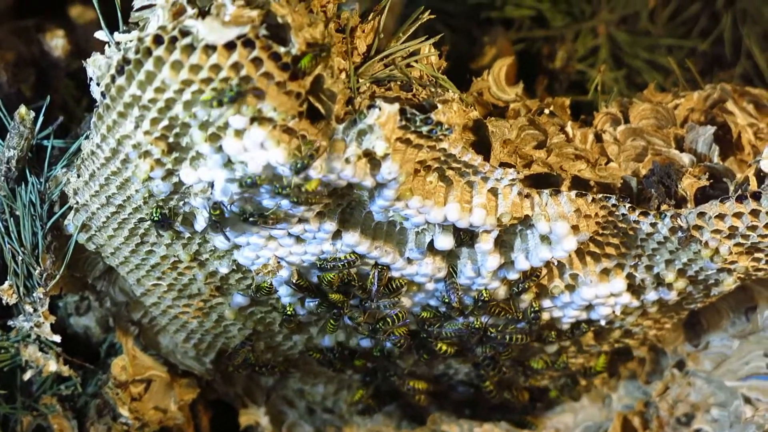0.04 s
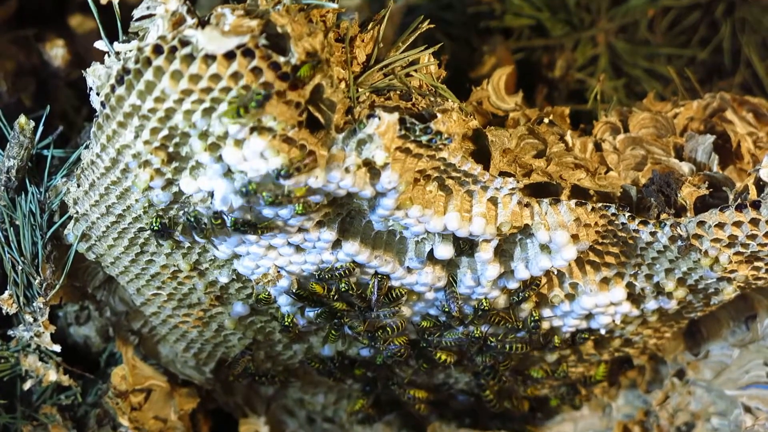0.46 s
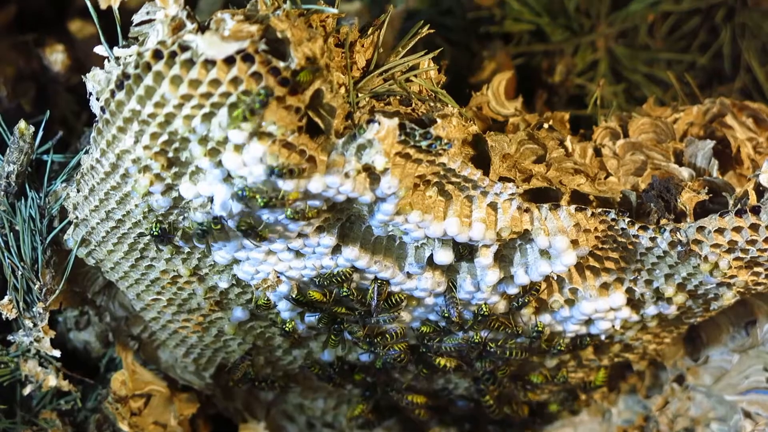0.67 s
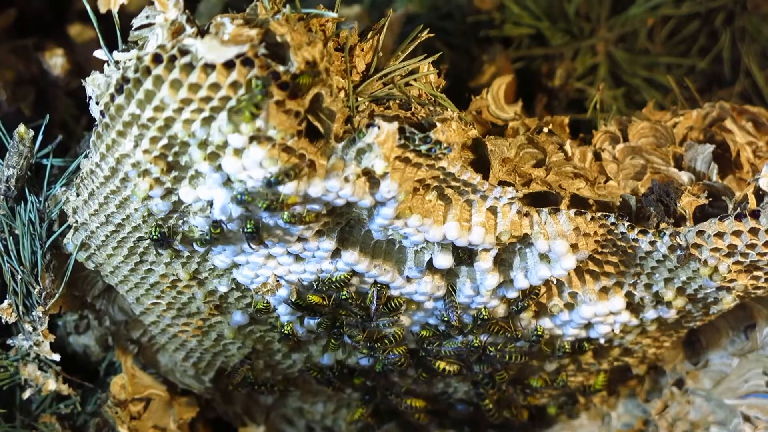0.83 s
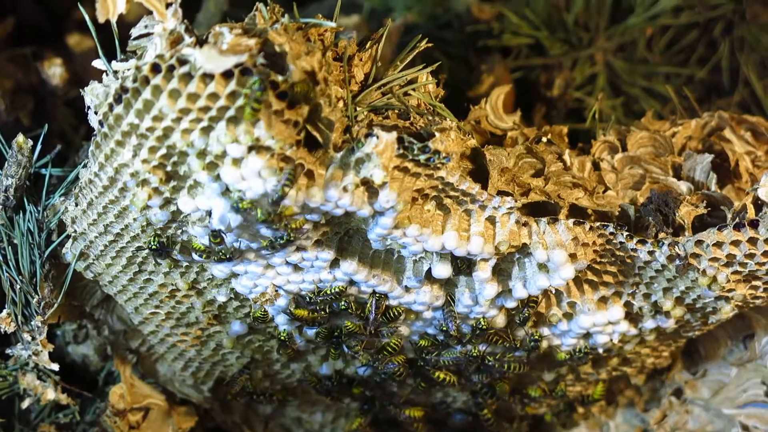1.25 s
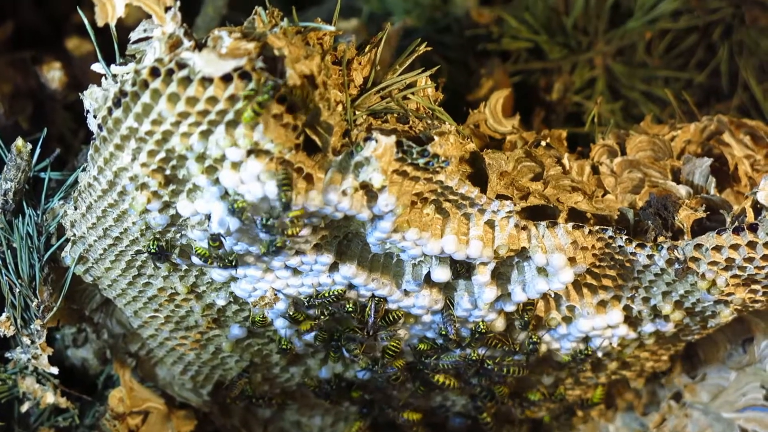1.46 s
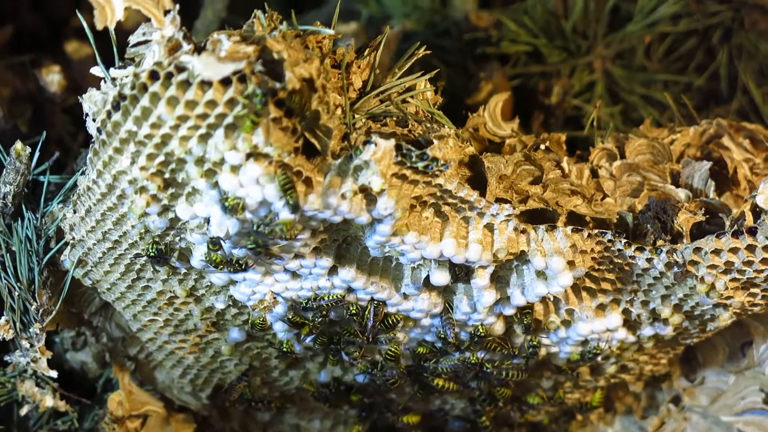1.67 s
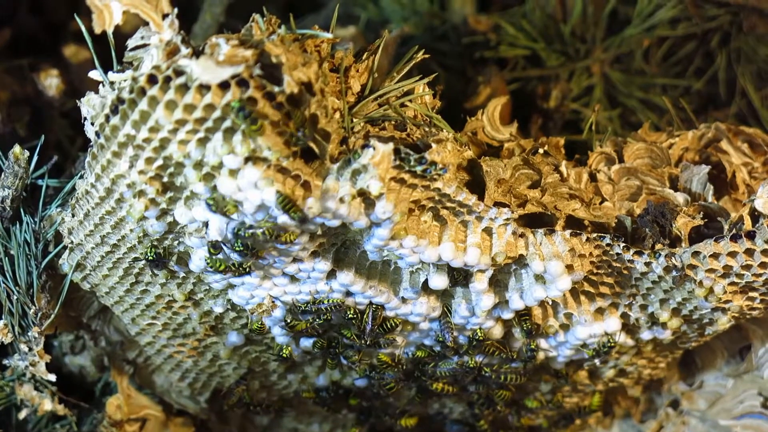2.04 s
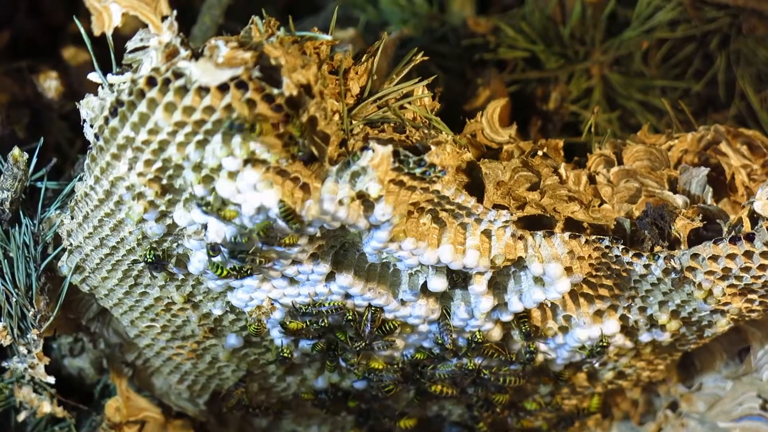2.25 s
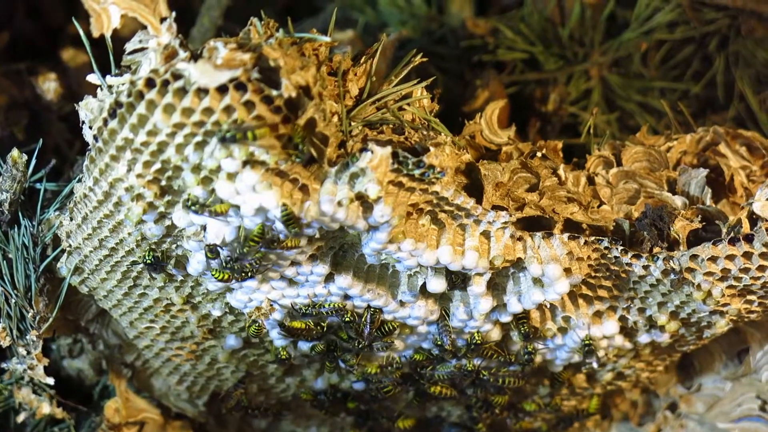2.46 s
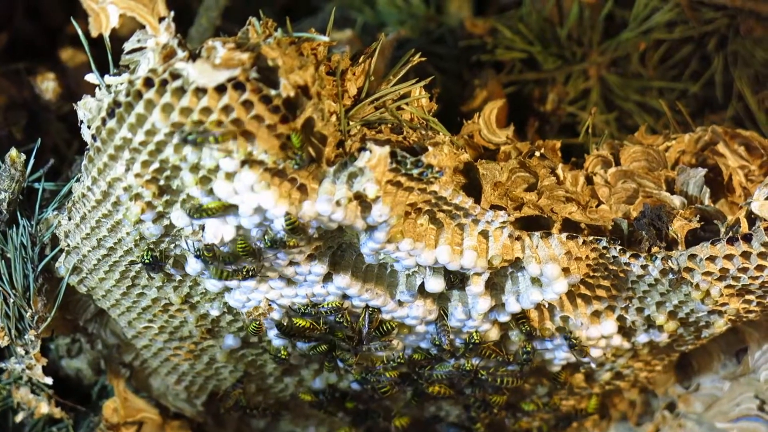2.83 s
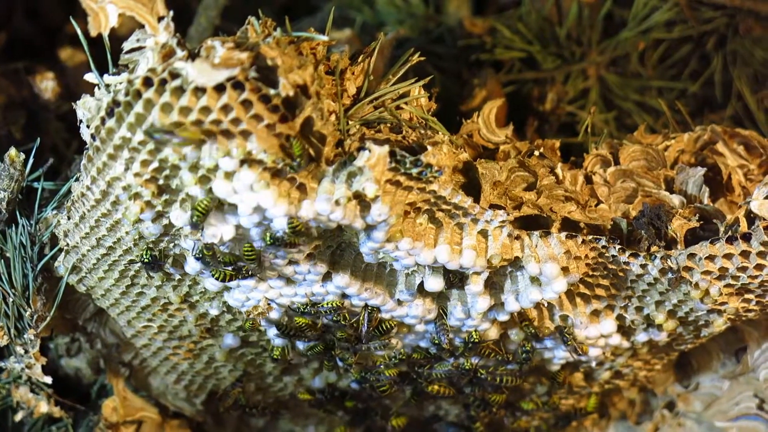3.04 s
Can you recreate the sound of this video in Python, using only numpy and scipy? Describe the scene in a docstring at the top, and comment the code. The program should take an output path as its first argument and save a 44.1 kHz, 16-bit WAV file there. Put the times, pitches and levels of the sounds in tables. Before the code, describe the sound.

Buzzing wasps fly near and away, with one sharp click and a faint colony hum.

```python
"""An open wasp nest among twigs, the microphone close in, the colony humming farther off over a soft hiss.
At once a wasp almost brushes the microphone, its wingbeats flaring into a rasp; a sharp click, like a
skip in the recorder, interrupts the close buzz with a short low thump. Two more wasps then buzz more
faintly, one at a lower pitch, and from about two seconds on another pair flies close. All along, stirred
air rumbles on the microphone, and now and then wing tips tick against the dry paper comb."""
import sys
import numpy as np
from scipy import signal
from scipy.fft import rfft, irfft, next_fast_len
from scipy.io import wavfile

SR = 44100
rng = np.random.default_rng(int(sys.argv[2]) if len(sys.argv) > 2 else 0)


def store_pcm(level_fs):
    """Save levels as 16-bit WAV."""
    pcm = np.round(np.clip(level_fs, -1, 1) * 32767).astype(np.int16)
    wavfile.write(sys.argv[1], SR, np.atleast_2d(pcm).T)


N = 136710
TIME = np.arange(N) / SR
WINGBEAT_JITTER = .00689  # fast waver, as a fraction of the wingbeat rate


def from_db(db):
    """Decibels to gain."""
    return 10 ** (np.asarray(db) / 20)


def unit_rms(x):
    """Scale to unit rms."""
    return x / np.sqrt(np.mean(x ** 2) + 1e-20)


def bell(x, centre, width):
    """A Gaussian bump of height 1."""
    return np.exp(-.5 * ((x - centre) / width) ** 2)


def in_time(rows):
    """Read each column at every sample, along the times in the first column."""
    times, *columns = np.transpose(rows)
    return [np.interp(TIME, times, column) for column in columns]


def at_hz(tone, hz):
    """Read a spectrum in dB on a log-frequency axis."""
    frequencies, db = np.transpose(tone)
    return np.interp(np.log(hz + 1e-3), np.log(frequencies), db)


def drift(rate_hz):
    """Smooth random wander of spread 1, mostly slower than rate_hz."""
    hop, run_in = 100, 1000
    pole = np.exp(-2 * np.pi * rate_hz * hop / SR)
    draws = rng.standard_normal(N // hop + run_in + 2)
    slow = signal.lfilter([1], [1, -2 * pole, pole * pole], draws)[run_in:]
    return np.interp(np.arange(N) / hop, np.arange(len(slow)), unit_rms(slow))


def coloured(x, tone):
    """Give a signal the colour of a spectrum table."""
    size = next_fast_len(N + SR // 10)
    gain = from_db(at_hz(tone, np.arange(size // 2 + 1) * SR / size))
    return irfft(rfft(x, size) * gain, size)[:N]


def noise(tone):
    """Coloured noise of unit rms."""
    return unit_rms(coloured(rng.standard_normal(N), tone))


def hiss():
    """Soft noise behind everything, slowly rising and falling."""
    # Loudness of the hiss. Each row: time in seconds, relative level in dB.
    levels = [(0.0, -64.5), (0.76, -61.5), (1.49, -68), (1.8, -65.5), (2.42, -60.5), (2.74, -61),
              (3.1, -62.5)]
    # Its colour. Each row: frequency in Hz, relative level in dB.
    tone = [(30, 13.5), (200, 17), (500, 13), (1000, 5.5), (2000, 1.5), (3200, -2), (5000, -4), (7500, -5),
            (10000, -4), (12400, -5), (12900, -63), (16000, -48)]
    return from_db(in_time(levels)[0] + 6) * noise(tone)


def low_rumble():
    """Stirred air makes a low, lumpy draught on the microphone; a few short thumps stand out of it."""
    # Strength of the draught. Each row: time in seconds, relative level in dB.
    draught_levels = [(0, -58.5), (.18, -57.5), (.27, -43), (.35, -60), (.41, -43.5), (.48, -53),
                      (.85, -53), (1.13, -58.5), (1.22, -44.5), (1.33, -55), (1.42, -48.5), (1.47, -53),
                      (1.54, -50), (1.68, -58), (1.85, -60), (1.92, -49), (2.02, -48.5), (2.22, -45),
                      (2.42, -37.5), (2.62, -51), (2.82, -44.5), (2.93, -54), (3.1, -50)]
    # Short low thumps: the first comes with the click, the later ones are wings fanning the microphone.
    # Each row: centre in seconds, level in dB, half-width in seconds.
    thumps = [(0.326, -20.5, 0.011), (1.544, -38.5, 0.018), (2.32, -33, 0.0085), (2.409, -36.5, 0.034),
              (2.5, -43, 0.031)]
    # Colours of draught and thumps. Each row: frequency in Hz, relative level in dB.
    draught_tone = [(10, 8.5), (25, 5), (50, -6), (80, -9.5), (120, -15), (200, -22.5), (400, -30),
                    (1000, -41), (8000, -100)]
    thump_tone = [(20, -18), (70, -5), (105, 3.5), (150, 0), (230, -6.5), (400, -24), (1000, -28.5),
                  (8000, -115)]
    draught = from_db(in_time(draught_levels)[0] + 6.5) * noise(draught_tone)
    thump_envelope = sum(from_db(db) * bell(TIME, centre, width) for centre, db, width in thumps)
    return draught + thump_envelope * noise(thump_tone)


def colony(wasps=6, harmonics=24, centre_hz=160.95, spread=.045, wander=.015):
    """Distant wasps, each wandering about its own wingbeat rate, beat against each other."""
    # The hum as it reaches the microphone. Each row: time in seconds, level in dB.
    levels = [(0, -52.5), (.3, -52.5), (.7, -53.5), (1, -91), (1.4, -59), (1.65, -67.5), (1.85, -57),
              (2.1, -47), (2.35, -42), (2.52, -45), (2.68, -46.5), (2.9, -55), (3.1, -49.5)]
    # Colour of a distant buzz. Each row: frequency in Hz, relative level in dB.
    tone = [(150, 3.5), (320, -2.5), (480, -9), (650, -13), (1000, -14.5), (1600, -21), (2500, -33),
            (4000, -35.5)]
    hum = 0
    for offset in np.linspace(-1, 1, wasps):
        hz = centre_hz * (1 + spread * offset)
        wingbeat_hz = hz * (1 + wander * drift(1.5) + WINGBEAT_JITTER * drift(28.6))
        phase = 2 * np.pi * np.cumsum(wingbeat_hz) / SR
        buzz = sum(from_db(at_hz(tone, k * hz)) * np.cos(k * phase + rng.normal(0, 1))
                   for k in range(1, harmonics + 1))
        hum = hum + buzz * from_db(1.93 * drift(2.23))
    return from_db(in_time(levels)[0]) * unit_rms(hum)


def wing_ticks(ticks_per_s=180, scatter_db=4.5, decay_s=.0011):
    """Wing tips brush the paper comb: short runs of dry ticks, one per wingbeat, that swell and fade."""
    # Brushes on the comb. Each row: centre in seconds, relative level in dB, swell and fade in seconds.
    brushes = [(.08, -52, 0.0054, .01), (.5315, -46.5, 0.00071, .004), (.6372, -48.5, 0.0089, 0.017),
               (.7328, -36.5, 0.0086, 0.011), (.7845, -41, 0.0075, 0.012), (1.377, -49.5, 0.0022, 0.0045),
               (2.1858, -50, 0.0072, .012), (2.389, -40, 0.022, 0.0055), (2.479, -51, .002, .003),
               (2.516, -52.5, 0.0051, 0.041), (2.577, -51, .008, .012), (2.608, -47, 0.0077, 0.0048),
               (2.926, -50.5, .004, .008)]
    # Colour of a tick. Each row: frequency in Hz, gain in dB.
    tone = [(1500, -26), (4000, -2.5), (7000, -2.5), (10000, 6), (12300, 4.5), (13000, -35), (16000, -60)]
    offsets_s = np.arange(-8, 9) / ticks_per_s
    strikes = np.zeros(N)
    for centre, db, swell, fade in brushes:
        contour = np.exp(-np.abs(offsets_s) / np.where(offsets_s < 0, swell, fade))
        samples = np.clip(((centre + offsets_s) * SR).astype(int), 0, N - 1)
        strikes[samples] += from_db(db + rng.normal(0, scatter_db, len(offsets_s))) * contour
    envelope = signal.lfilter([1], [1, -np.exp(-1 / (decay_s * SR))], strikes + 1e-18)
    return coloured(envelope * rng.standard_normal(N), tone)


def click(at_s=.325, db=-23.5, decay_s=.0011):
    """One sharp click, like a skip in the recorder: the wave rises, drops at once and settles."""
    age = TIME - at_s
    return -from_db(db) * np.sign(age) * np.exp(-np.abs(age) / decay_s)


def wing_swish(stroke_phase, sharpness=2.7):
    """Air torn by the wings: one wisp of noise at each stroke."""
    # Colour of the torn air. Each row: frequency in Hz, relative level in dB.
    tone = [(400, -31), (900, -0.5), (1700, -15.5), (2600, -30.5), (4000, -36), (8000, -10), (12500, -27),
            (14000, -62)]
    return unit_rms(noise(tone) * np.exp(sharpness * (np.cos(stroke_phase) - 1)))


def wasp(flight, tone, wander_rad, shimmer_db, flare_db=0, shimmer_hz=5.3, fade_s=.027):
    """One sawtooth-like pressure drop per wingbeat; the harmonics shimmer as the insect turns."""
    hz, fundamental_db, octave_db, overtone_db = in_time(flight)
    phase = 2 * np.pi * np.cumsum(hz * (1 + WINGBEAT_JITTER * drift(33.3))) / SR
    hum = from_db(fundamental_db) * np.cos(phase) + from_db(octave_db) * np.cos(2 * phase)
    edge = phase + 1.196  # a stroke's sharp edge leads its pressure trough
    rasp = 0
    for k in range(3, 33):
        partial_hz = k * hz.mean()
        db = at_hz(tone, partial_hz) + shimmer_db * drift(shimmer_hz)
        db += flare_db * bell(partial_hz, centre=1980, width=540)
        rasp = rasp + from_db(db) * np.sin(k * edge + wander_rad * drift(shimmer_hz))
    overtones = from_db(overtone_db) * (unit_rms(rasp) + from_db(-23) * wing_swish(edge))
    inside_flight_s = np.minimum(TIME - flight[0][0], flight[-1][0] - TIME)
    fade = np.clip(inside_flight_s / fade_s + 1, 0, 1)
    return -from_db(-1.5) * fade * (np.sqrt(2) * hum + overtones)


def nearby_wasps():
    """Four wasps a little way off the microphone, two at a time, their pulses blurred by phase wander."""
    # Flights about the nest. Each row: time in seconds, wingbeat in Hz,
    # then relative levels in dB of the fundamental, the octave and the overtones.
    hovering = [(.62, 164.1, -51, -61, -71), (.72, 170.3, -49.5, -65, -64), (.8, 172, -51.5, -66, -70),
                (.9, 168.5, -54.5, -73, -77), (.98, 170.9, -57.5, -89, -61), (1.1, 167.9, -51, -66, -61.5),
                (1.18, 162.4, -50, -57, -56.5), (1.3, 164.1, -58.5, -61.5, -63),
                (1.42, 160.7, -86, -76, -82), (1.62, 161.7, -72, -68, -86), (1.72, 162.9, -61, -65, -57.5),
                (1.86, 156.1, -63, -71, -69)]
    low_flight = [(.62, 152.2, -53, -62, -62), (0.692, 149.7, -63, -43.5, -60),
                  (0.782, 140.1, -52, -58, -52.5), (.87, 137.1, -57, -56.5, -70),
                  (.97, 140.6, -58, -59.5, -83), (1.1, 125.9, -60, -65.5, -85), (1.311, 125, -94, -74, -71),
                  (1.431, 142.5, -71, -56, -75), (1.506, 136.4, -78, -49.5, -56),
                  (1.557, 140.5, -37, -43.5, -50.5), (1.6, 145.3, -48.5, -59.5, -60),
                  (1.66, 136.6, -62, -66, -80)]
    circling = [(1.86, 157.8, -71, -68, -64.5), (1.912, 159.5, -41, -49.5, -54.5),
                (1.978, 161.3, -43.5, -67, -48), (2.089, 157.8, -45.5, -78, -53),
                (2.155, 158.4, -30, -39, -48.5), (2.205, 158, -44, -51, -53.5),
                (2.247, 158.9, -35, -67, -44), (2.289, 164.7, -25, -35, -40),
                (2.346, 161.8, -61, -43.5, -58.5), (2.391, 160.5, -44, -54, -44),
                (2.449, 160.8, -48, -55, -77), (2.53, 164, -37, -49, -47.5),
                (2.581, 163.5, -42, -48, -45.5), (2.69, 162.7, -63, -75, -74),
                (2.736, 163.6, -43, -73, -52), (2.79, 165.3, -72, -76, -73), (2.87, 165, -48.5, -85, -54),
                (2.94, 165.7, -54, -77, -61), (3, 168.7, -46, -53, -53), (3.1, 165.4, -48, -59, -49.5)]
    crossing = [(1.95, 154, -65, -56.5, -66), (2.1, 154.7, -62, -70, -58), (2.221, 151.5, -55, -46, -50),
                (2.302, 149.5, -29, -51, -57), (2.34, 147.6, -55, -44.5, -54),
                (2.42, 150.9, -35.5, -43, -48.5), (2.52, 154.7, -39, -45, -54),
                (2.62, 156.7, -58, -72, -66), (2.78, 150.7, -54.5, -66, -64),
                (2.95, 153.5, -68, -83, -59.5), (3.1, 160.1, -48, -68, -72)]
    # Wingbeat overtones at this distance. Each row: frequency in Hz, relative level in dB.
    tone = [(470, 3.5), (630, -10.5), (800, -5), (950, -14.5), (1270, -18), (1450, -19.5), (1900, -26),
            (2500, -28.5), (4000, -35), (6000, -47)]
    flights = (hovering, low_flight, circling, crossing)
    return sum(wasp(flight, tone, wander_rad=.86, shimmer_db=5.5) for flight in flights)


def closest_wasp():
    """A wasp almost brushes the microphone; a band of its crisp buzz flares as its wings turn that way."""
    # The close pass. Each row: time in seconds, wingbeat in Hz,
    # then relative levels in dB of the fundamental, the octave and the overtones.
    flight = [(0, 157.7, -47, -45, -55.5), (.04, 155.7, -45.5, -52.5, -71.5), (.11, 153.4, -71, -66, -54),
              (.145, 154.3, -50, -55, -62), (.2, 155.7, -44, -52, -52.5), (.262, 152.7, -32.5, -36.5, -43),
              (.292, 151, -25, -46.5, -37), (.315, 154.2, -24.5, -31.5, -33.5),
              (.338, 161.1, -23.5, -34, -44.5), (.372, 156.8, -26, -34.5, -37),
              (.424, 160, -33.5, -44, -43.5), (.484, 157.4, -37.5, -50.5, -49.5),
              (.508, 158, -45, -70, -57), (.6, 157.2, -37.5, -55, -43), (.65, 159.1, -51, -51, -73),
              (.68, 156, -44, -71, -66)]
    # Wingbeat overtones close up. Each row: frequency in Hz, relative level in dB.
    tone = [(470, 4.5), (630, -4), (800, -5.5), (950, -8.5), (1330, -12.5), (1480, -19), (1650, -26.5),
            (1950, -30), (2300, -34.5), (4000, -35.5), (6000, -46)]
    flare_db = 20.5 * bell(TIME, centre=.35, width=.018)
    return wasp(flight, tone, wander_rad=.22, shimmer_db=2.2, flare_db=flare_db)


def scene():
    """Near wasps, colony, ticks, rumble and hiss meet at one microphone beside the nest."""
    return (closest_wasp() + nearby_wasps() + colony() + wing_ticks() + low_rumble() + hiss())[None]


def record(dry, overload=.13, cutoff_hz=16800):
    """The loudest swings are flattened, a click interrupts the close buzz, and the top is cut."""
    rounded = dry / (1 + (dry / overload) ** 8) ** (1 / 8)
    lowpass = signal.cheby2(12, 70, cutoff_hz, fs=SR, output="sos")
    return signal.sosfilt(lowpass, rounded + click())


dry = scene()
out = record(dry)
store_pcm(out)
```